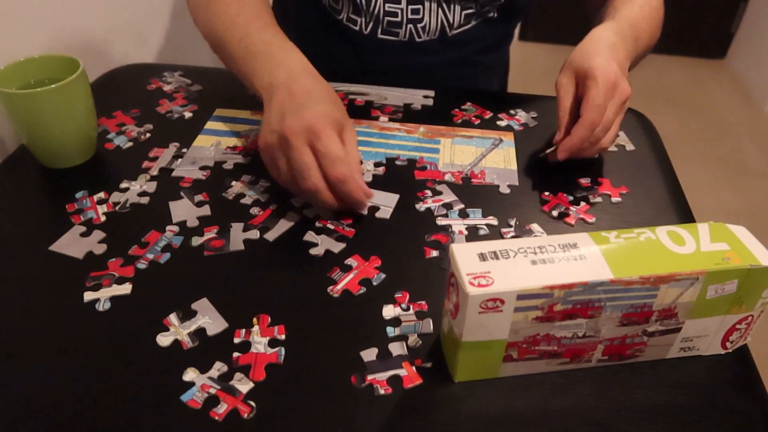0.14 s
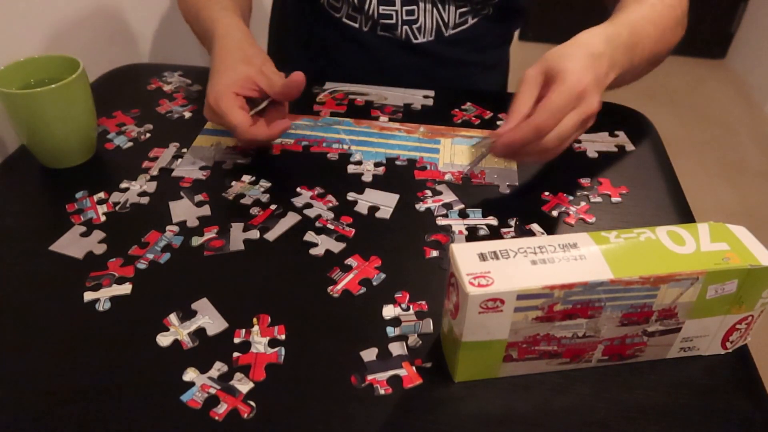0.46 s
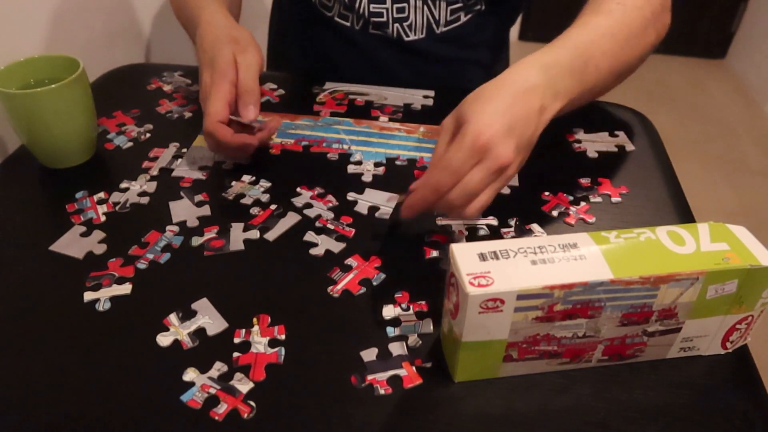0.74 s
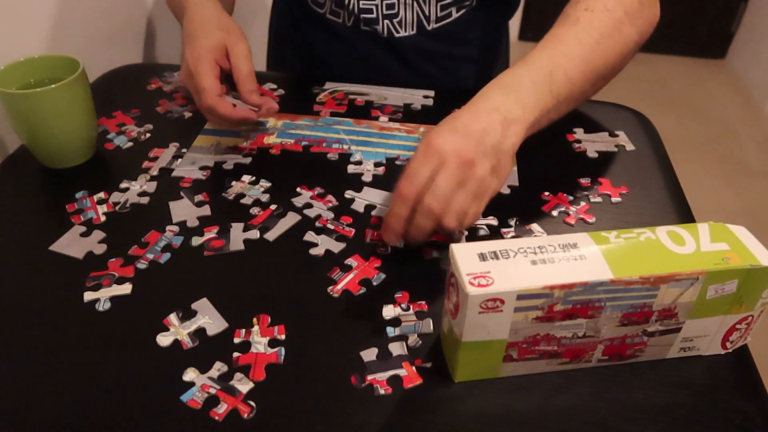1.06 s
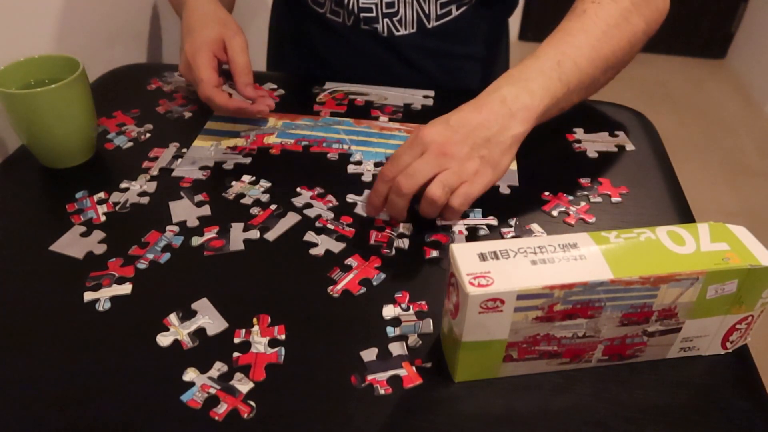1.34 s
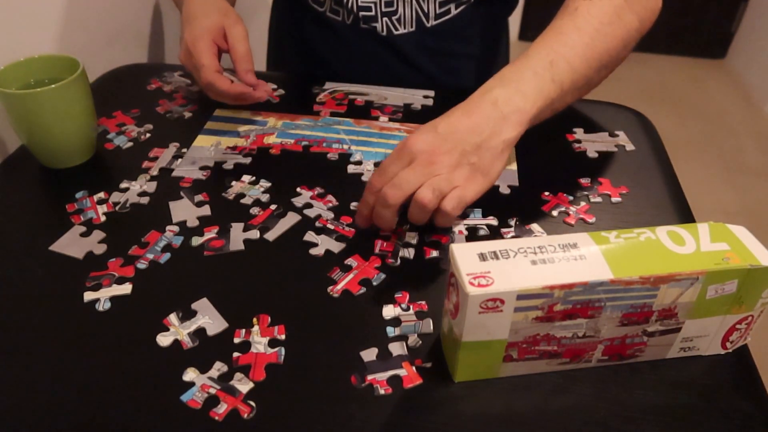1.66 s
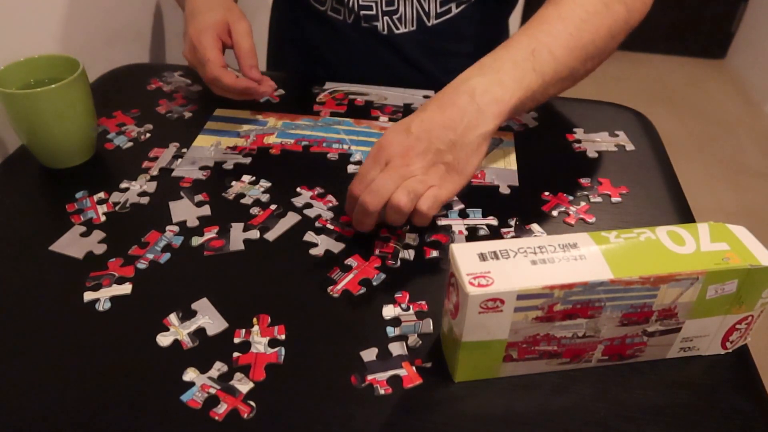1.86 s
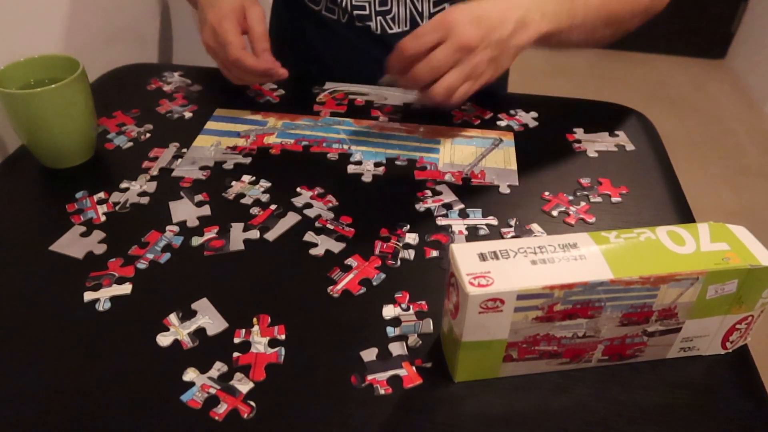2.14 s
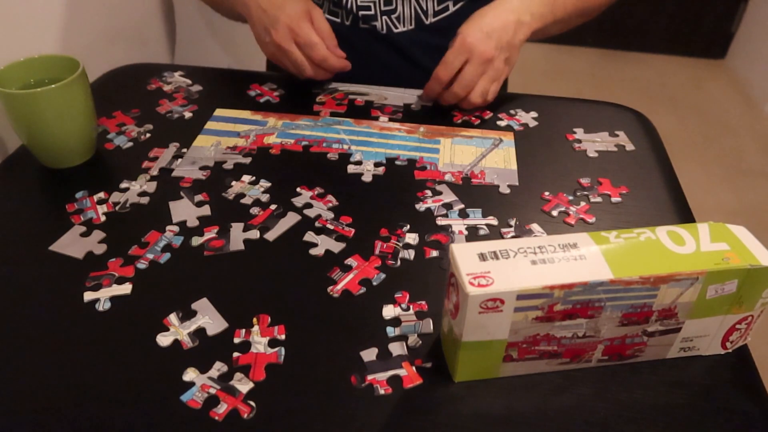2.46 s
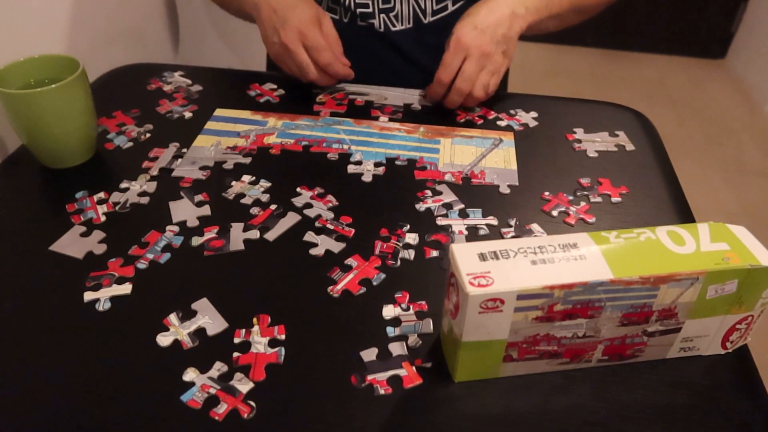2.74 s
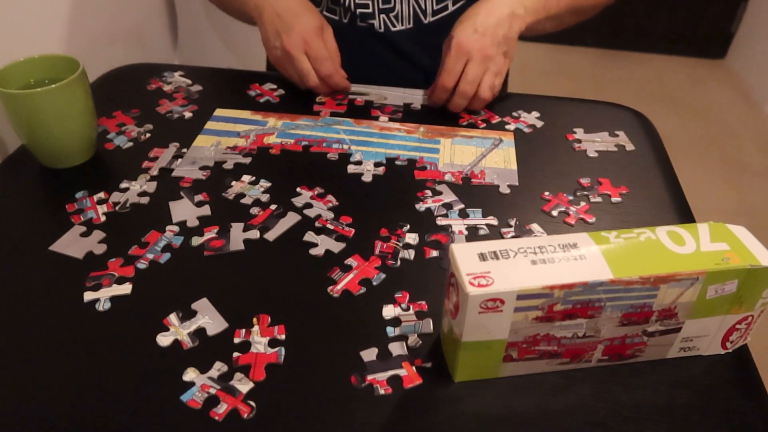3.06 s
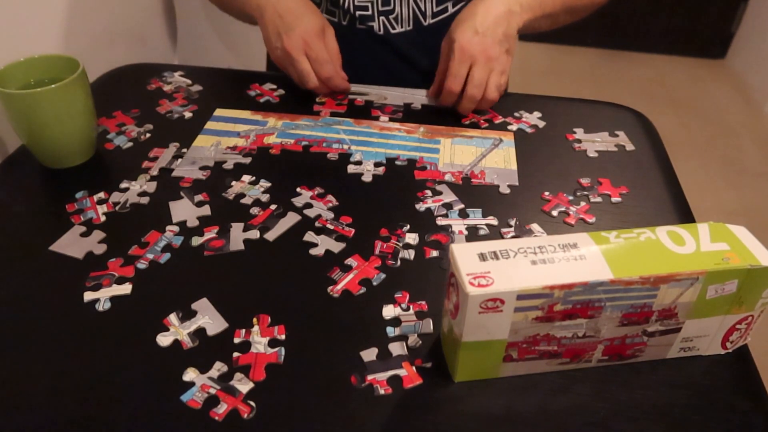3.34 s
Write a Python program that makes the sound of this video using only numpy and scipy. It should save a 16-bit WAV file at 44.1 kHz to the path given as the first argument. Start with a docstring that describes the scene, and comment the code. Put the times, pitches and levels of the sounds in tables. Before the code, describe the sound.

Scattered taps and clicks of jigsaw pieces being handled and pressed together on a tabletop.

```python
"""A steady hiss and faint rubbing come first: fingers feel for cardboard puzzle pieces in a quiet room.
Pieces tap on a hard table, one skids off into the fingers, and others click together or are pressed home.
Each contact is a brief crack plus the ring of the tabletop or of the piece; fingers add a low thump.
Rubbing and skidding are streams of tiny slips. The small room answers briefly and rumbles softly,
and the hiss comes from a nearly mono microphone."""
import sys
import numpy as np
from scipy import signal
from scipy.fft import rfft, irfft, next_fast_len
from scipy.io import wavfile
from scipy.ndimage import uniform_filter1d

SR = 44100
rng = np.random.default_rng(int(sys.argv[2]) if len(sys.argv) > 2 else 0)


def output_pcm(signal):
    """Save a mono or channel-first signal as 16-bit PCM at the path in sys.argv[1].

    Samples are clipped to [-1, 1] before scaling.
    """
    pcm = np.clip(np.atleast_2d(signal).T, -1, 1) * 32767
    wavfile.write(sys.argv[1], SR, np.round(pcm).astype(np.int16))


N = 154350

# Tone of the room's rumble and the microphone's hiss (frequency [Hz], relative level [dB])
BACKGROUND_TONE = [(25, -12), (34, -26), (46, -2.5), (62, -14), (105, -1), (270, -6.5), (520, -12),
                   (730, -13.5), (1250, -15.5), (1640, -15.5), (3500, -19.5), (4700, -20), (13800, -20),
                   (15800, -23.5)]
# How much left and right differ in that background (frequency [Hz], side minus middle [dB])
BACKGROUND_WIDTH = [(60, -40), (300, -12.5), (1500, -8), (5000, -5), (11000, -4.5), (13000, -21)]
# Skin rubbing on card (peak time [s], level [dB], rough half length [s], centre frequency [Hz])
FINGER_RUBS = [(0.046, -55, 0.0057, 1200), (0.11, -53.5, 0.027, 1110), (0.194, -51, 0.011, 930),
               (0.466, -51.5, 0.0053, 11000), (0.44, -64, 0.023, 7500), (.505, -58, 0.0084, 4300),
               (0.873, -60.5, 0.018, 5860), (1.46, -65.5, .05, 7050), (1.804, -57, 0.037, 835),
               (2.16, -65, .025, 7500), (3.113, -57, 0.0085, 7500), (3.118, -59, 0.014, 910)]

# Contacts. Level, midrange and treble shape the crack and ring; the thump has its own level.
# (time [s], level [dB], midrange [dB], treble [dB], thump [dB], pitch [ratio])
CLICKS = [(.1096, -21.5, -34, 2, -36, 0.71), (2.5925, -19, -7, 3, -42, 0.94), (2.5995, 0, -2, 1.5, -23, 1),
          (2.6026, -9.5, 1, 3.5, -26, 0.98), (2.798, -19, -18, -13, -40, 0.5)]  # piece against piece
MID_TABLE_TAPS = [(.1277, -1, 8, -1, 0, 1.007), (.9115, -10, -1.5, -15, -11, 1),
                  (.966, -18, -24, -25, -4, 0.71), (1.1022, 1, -1, -10.5, -3.5, 0.978),
                  (1.3375, -16, 7, -39, 2, 1.06), (1.7035, -12, -5, -24, 6, .85),
                  (1.784, -14.5, -3, -26, -20, 0.69), (1.846, -18, -3, -26, -23, 0.81)]  # among the loose pieces
EDGE_PRESSES = [(2.4682, -15.5, -7.5, -31, -13, 0.98), (2.9303, -2, -9.5, -1.5, 1, 1),
                (3.312, -24, -2, -2, -25, 0.81), (3.321, -18, -4, -8, -25, 1),
                (3.3244, 5.5, 1, 4, 11.5, 0.98)]  # pieces pressed home near the table's edge
# The notes each contact rings with (frequency [Hz], level [dB], time to fade by 60 dB [s])
CLICK_NOTES = [(2290, 1, 0.032), (2700, -2.5, .01), (4940, 0, 0.022), (7030, -1.5, .005), (7560, 4, 0.014)]
TAP_NOTES = [(446, 8, 0.072), (750, -4, 0.022), (1040, 4, 0.037), (1173, 8.5, 0.057), (1856, 0, 0.018),
             (2400, -2.5, 0.0078), (3540, -0.5, 0.016), (4600, -5.5, 0.0023), (5800, -2, 0.01),
             (6560, -16, 0.0072)]
PRESS_NOTES = [(390, 2, .05), (455, 11, .045), (700, 5, .02), (780, 13, .024), (1450, 4, .018),
               (1630, 11, .015), (1860, 8, .013), (2350, -3, .008), (3800, -1, .006), (7400, -3, .004)]
THUMP_NOTES = [(102.2, 13, 0.28), (123, 0.5, 0.16), (149, 2, 0.37), (193, 0, 0.33)]  # the table's low notes, shared by all contacts
# Tone of each contact's crack (frequency [Hz], level [dB])
CLICK_CRACK = [(150, -27), (400, -10), (1200, -26), (3000, -10), (6000, -10), (9500, -10), (12000, -17),
               (16000, -27)]
TAP_CRACK = [(150, -1.5), (500, -11.5), (1500, -3.5), (3000, -6), (6000, -5.5), (9500, -7.5), (11500, -18),
             (16000, -19)]
PRESS_CRACK = [(130, -1), (270, -26), (500, 1), (1150, -2.5), (2500, -2.5), (3700, 1.5), (5500, 0.5),
               (9500, 0.5), (12000, -6.5), (16000, -21)]

# Bands that ring in the skid (frequency [Hz], half width [Hz], relative level [dB], swell time [s])
SKID_BANDS = [(730, 46, -8, 0.0041), (987, 156, 7.5, 0.0053), (1940, 200, 4.5, 0.0074),
              (2910, 180, 0, .006), (4160, 550, 1.5, 0.0066), (5400, 220, -4, 0.0051),
              (6400, 700, -8, 0.0078), (8250, 710, -14.5, 0.01), (12300, 2800, -17, 0.011)]
# The room's first echoes (delay [s], level [dB])
EARLY_ECHOES = [(.0066, -7.5), (0.0139, -9), (.0145, -8), (0.0213, -14.5), (0.0319, -14)]
# Tone of the tail, the wash of later echoes (frequency [Hz], level [dB])
TAIL_TONE = [(100, 1), (400, 2.5), (800, -2), (1800, -4.5), (3600, -3), (5500, -5.5), (9000, -3),
             (14000, -13)]
# How long the tail lasts (frequency [Hz], time to fade by 60 dB [s])
TAIL_FADE = [(100, 0.43), (450, 0.18), (800, 0.2), (1300, 0.26), (4000, 0.25), (8000, 0.27), (14000, 0.14)]


def amp(db):
    """Turns decibels into a number to multiply a sound by."""
    return 10 ** (np.asarray(db) / 20)


def read(points, hz):
    """Looks up a frequency in a table, sliding between rows on a pitch scale."""
    f, value = np.transpose(points)
    return np.interp(np.log(hz + 1), np.log(f + 1), value)


def unit(x):
    """Scales a sound to an average power of 1."""
    return x / np.sqrt(np.mean(x ** 2) + 1e-20)


def add(mix, start_s, sound):
    """Mixes a sound in at a given time."""
    part = mix[max(round(start_s * SR), 0):][:len(sound)]
    part += sound[:len(part)]


def colour(x, db_at):
    """Turns each frequency up or down by db_at(Hz), without smearing sound back in time."""
    size = next_fast_len(2 * len(x))
    log_gain = np.log(amp(db_at(abs(np.fft.fftfreq(size, 1 / SR)))) + 1e-6)
    response = np.exp(np.conj(signal.hilbert(log_gain)))
    return np.fft.ifft(np.fft.fft(x, size) * response).real[:len(x)]


def whiten(x, size):
    """Evens out a burst's tone over `size` neighbouring frequencies and fades its second half."""
    spectrum = np.fft.fft(x)
    local_power = uniform_filter1d(abs(spectrum) ** 2, size, mode="wrap")
    flat = np.fft.ifft(spectrum / np.sqrt(local_power + 1e-20)).real
    return flat * np.minimum(np.linspace(2, 0, len(x)), 1) ** 2


def background(level_db=-55):
    """Room rumble and microphone hiss: a middle both ears share, and a side where they differ."""
    f = np.fft.rfftfreq(N, 1 / SR)
    mid, side = rfft(rng.standard_normal((2, N))) * amp(read(BACKGROUND_TONE, f))
    both = irfft(np.array([mid, side * amp(read(BACKGROUND_WIDTH, f))]), N)
    return amp(level_db) * both / both[0].std()


def friction(spread_db=1.5):
    """Tiny slips of uneven size: noise whose level jumps every 32 samples."""
    return rng.standard_normal(N) * amp(-spread_db * np.repeat(rng.standard_normal(N), 32)[:N])


def rubs(width_octaves=0.84):
    """Faint swells of friction as fingers feel for pieces."""
    out, t, f = np.zeros(N), np.arange(N) / SR, np.fft.rfftfreq(N, 1 / SR)
    slips = rfft(friction())
    for peak_s, level_db, half_s, hz in FINGER_RUBS:
        band = np.exp(-.5 * (np.log2((f + 1) / hz) / width_octaves) ** 2)
        swell = np.exp(-.5 * ((t - peak_s) / half_s) ** 2)
        out += amp(level_db) * swell * unit(irfft(slips * band, N))
    return out


def crackle(envelope, passes):
    """A run of tiny impacts whose loudness follows the envelope."""
    x = rng.standard_normal(len(envelope)) * envelope
    for _ in range(passes):
        x = irfft(np.exp(1j * np.angle(rfft(x))), len(x))  # make all frequencies equally strong
        x = x * envelope / np.sqrt(abs(uniform_filter1d(x ** 2, size=40)) + 1e-12)
    return x / np.linalg.norm(x)


def ring(notes, t):
    """An object struck at t = 0 rings with fading notes; each dB value is a peak in its spectrum."""
    out, t = np.zeros(len(t)), np.maximum(t, 0)
    for hz, db, fade_s in notes:
        rate = np.log(1000) / fade_s
        out += amp(db) * 2 * rate / SR * np.exp(-rate * t) * np.sin(2 * np.pi * hz * t)
    return out


def contact(notes, crack_tone, level_db, mid_db, treble_db, thump_db, pitch):
    """One contact: a crack of tiny impacts, the ring of piece or tabletop, and the table's thump."""
    crack_rise_s, crack_fade_s, thump_rise_s = 0.000709, 0.0019, 0.0084
    low_cut_hz, mid_hz, mid_octaves, treble_hz = 470, 1630, 0.3, 3240

    def hardness_db(f):
        """More midrange and treble make a contact sound harder; the bass is always trimmed."""
        midrange = mid_db * np.exp(-.5 * (np.log2((f + 1) / mid_hz) / mid_octaves) ** 2)
        treble = treble_db * (1 - 1 / (1 + (f / treble_hz) ** 4))
        bass_cut = 10 * np.log10(1 + (low_cut_hz / (f + 10)) ** 4)
        return midrange + treble - bass_cut

    t = np.arange(SR // 2) / SR
    envelope = (1 - np.exp(-t / crack_rise_s)) * np.exp(-t / crack_fade_s)
    crack = np.zeros(len(t))
    add(crack, 0, colour(crackle(envelope[:2048], passes=10), lambda f: read(crack_tone, f)))
    body = ring(notes, pitch * (t - crack_rise_s))
    thump = ring(THUMP_NOTES, t) * (1 - np.exp(-t / thump_rise_s))
    return amp(level_db) * colour(crack + body, hardness_db) + amp(thump_db) * thump


def contacts():
    """Pieces click together, tap the table and are pressed home."""
    out = np.zeros(N)
    for rows, notes, crack_tone in [(MID_TABLE_TAPS, TAP_NOTES, TAP_CRACK),
                                    (EDGE_PRESSES, PRESS_NOTES, PRESS_CRACK),
                                    (CLICKS, CLICK_NOTES, CLICK_CRACK)]:
        for start_s, *settings in rows:
            add(out, start_s, contact(notes, crack_tone, *settings))
    return out


def skid(peak_s=2.079, level_db=-33, fade_s=0.0042):
    """A piece scrapes off the table: its own high ringing swells first, the tabletop's last."""
    out, t, f = np.zeros(N), np.arange(N) / SR - peak_s, np.fft.rfftfreq(N, 1 / SR)
    slips, power = unit(friction()), 0
    for hz, half_width, db, swell_s in SKID_BANDS:
        gain = lambda f: amp(db) / (1 + ((f - hz) / half_width) ** 2)
        stroke = slips * np.exp(np.minimum(t / swell_s, -t / fade_s))
        out += irfft(rfft(stroke) * gain(f), N)
        power += np.mean(gain(np.linspace(0, SR / 2, SR)) ** 2)
    return amp(level_db) * out / np.sqrt(power)


def room_tail(rise_s=0.011):
    """Many late echoes blur into a wash, each frequency dying away at its own speed."""
    t = np.arange(SR // 2) / SR
    hz, age_s, noise = signal.stft(rng.standard_normal(len(t)), SR, nperseg=256)
    fade = amp(-60 * age_s / read(TAIL_FADE, hz)[:, None])
    wash = signal.istft(noise * fade, SR, nperseg=256)[1][:len(t)]
    rise = 1 - np.exp(-(t / rise_s) ** 2)
    return colour(whiten(wash * rise, size=30), lambda f: read(TAIL_TONE, f))


def room(x, echo_db, scatter_s=0.00033):
    """The direct sound, followed by slightly scattered early echoes and the tail."""
    response, t = room_tail(), np.arange(SR // 20) / SR
    for delay_s, db in EARLY_ECHOES:
        burst = rng.standard_normal(len(t)) * np.exp(-t / scatter_s)
        add(response, delay_s, amp(db) * whiten(burst, size=50))
    return x + amp(echo_db) * signal.fftconvolve(x, response)[:N]


def scene():
    """Hands and pieces sound in the centre, over the background; returns left and right."""
    hiss, side = background()
    mid = room(contacts() + rubs(), echo_db=-1) + room(skid(), echo_db=-6) + hiss
    return np.array([mid + side, mid - side])


def record(dry):
    """Cuts away the very highest treble."""
    cutoff_hz = 16150
    low_pass = signal.firwin(401, cutoff_hz, window=("kaiser", 9), fs=SR)
    return signal.oaconvolve(dry, low_pass[None], "same")


dry = scene()
out = record(dry)
output_pcm(out)
```